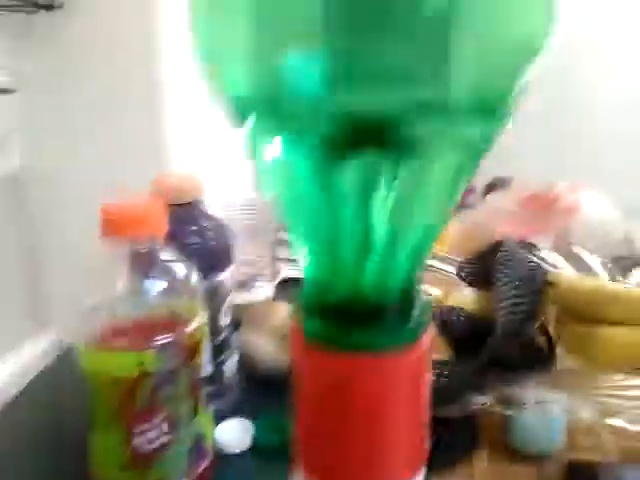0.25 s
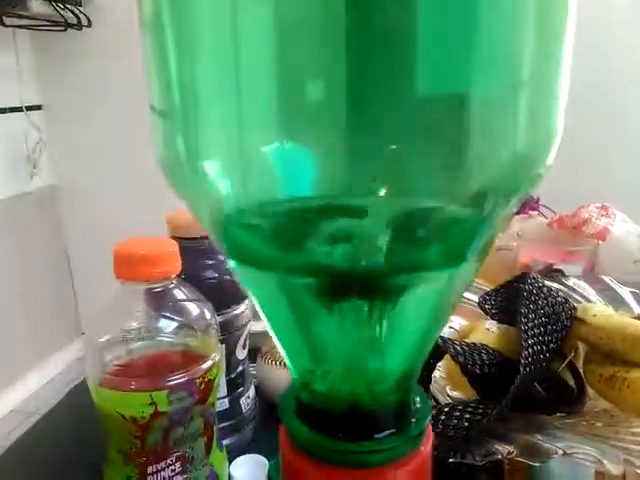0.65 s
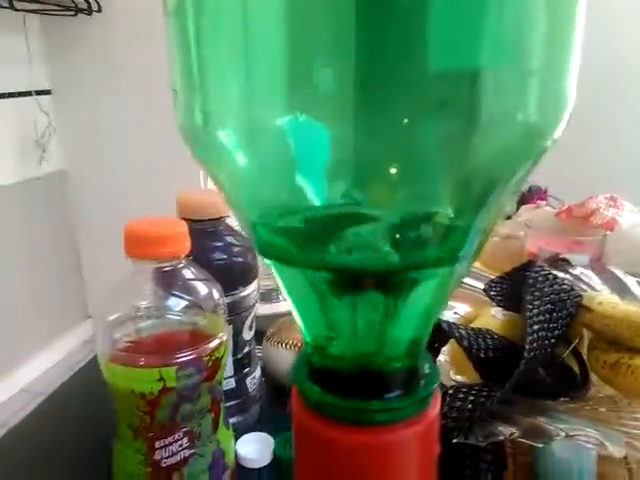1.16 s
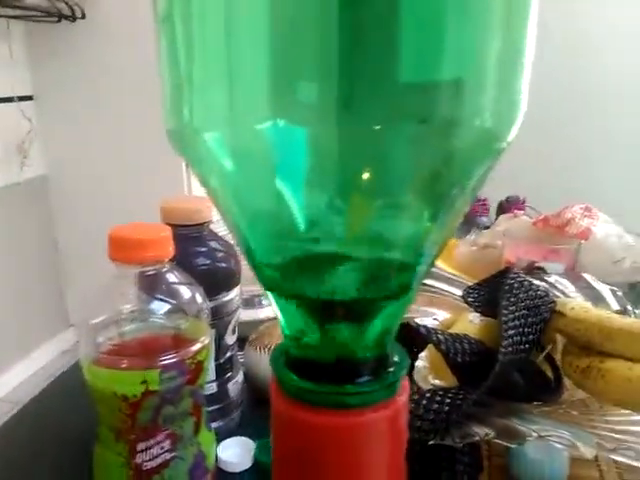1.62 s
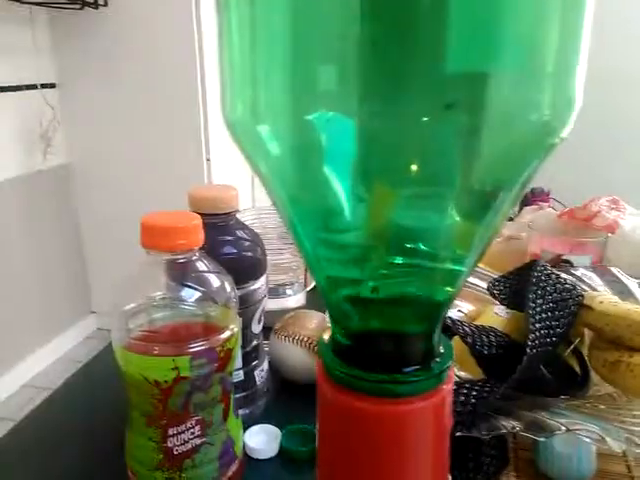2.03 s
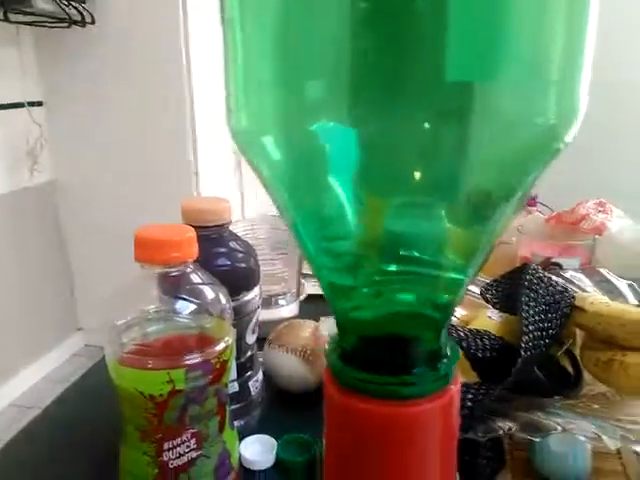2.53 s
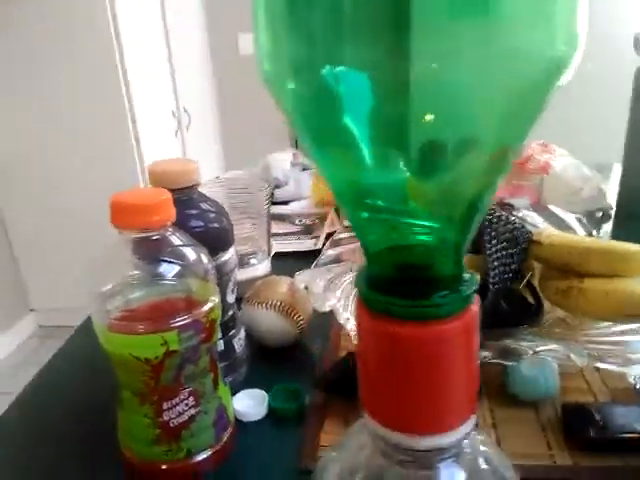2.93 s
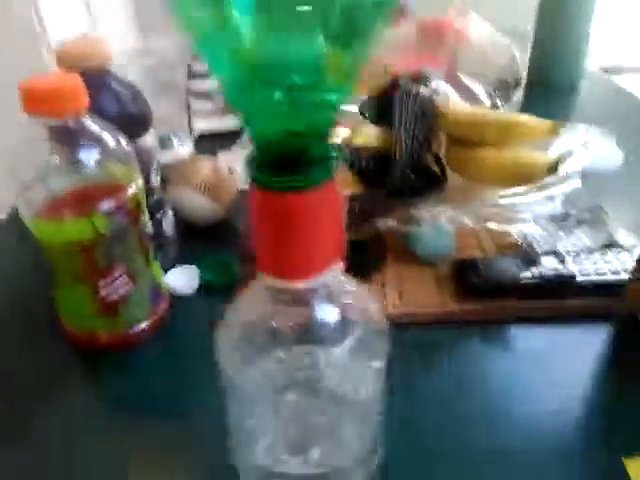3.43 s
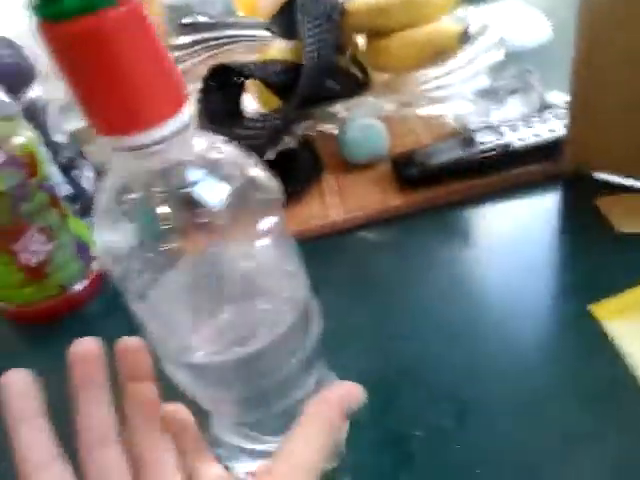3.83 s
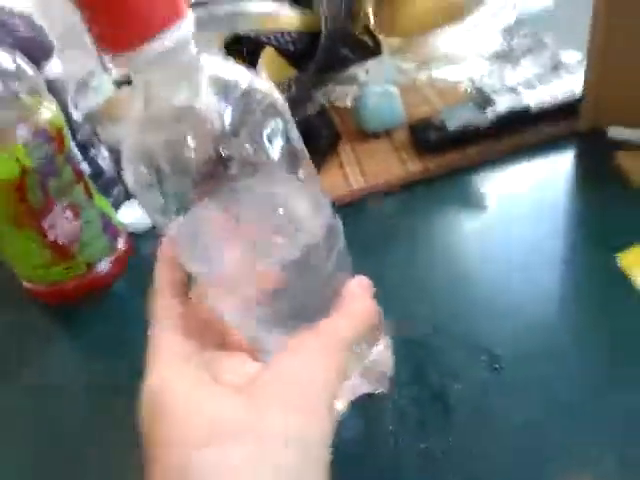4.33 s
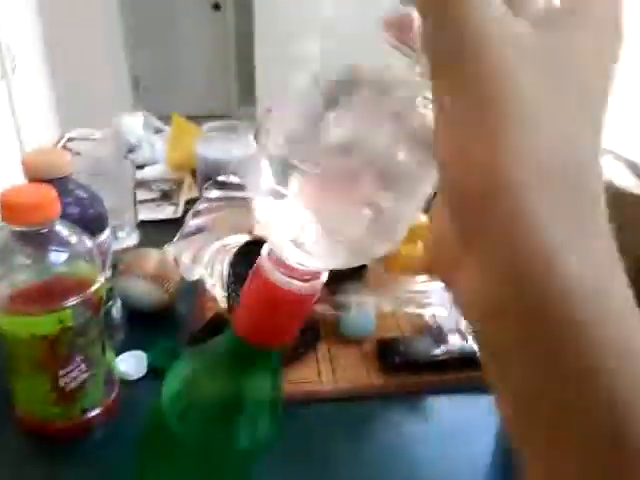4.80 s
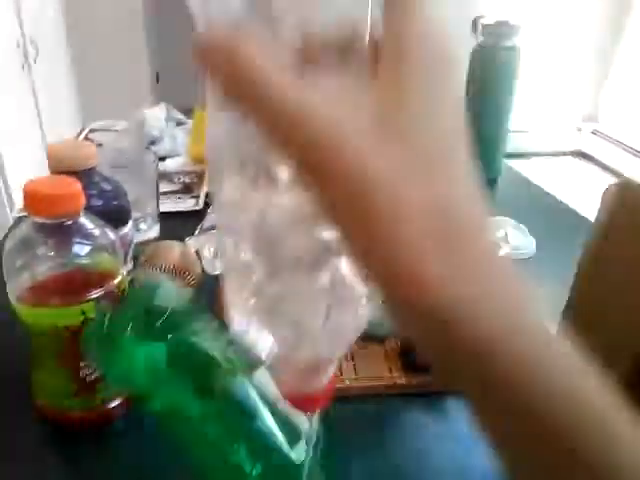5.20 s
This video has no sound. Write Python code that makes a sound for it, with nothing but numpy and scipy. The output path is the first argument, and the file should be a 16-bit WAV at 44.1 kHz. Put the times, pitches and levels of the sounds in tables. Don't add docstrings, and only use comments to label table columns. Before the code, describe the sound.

A close, hand-held stereo microphone in a lightly reverberant kitchen. From 0 to about 2.4 seconds water swirls between two plastic bottles: a frothy burst at the very start, then irregular mid-pitched glugs and pops, quick high pings, ticking drops and fine spitting fizz. The bubbling is busiest in the first second, with sharp pops near 1.0, 1.1 and 1.5, then thins out and runs dry around 2.5. Until 4.8 it is nearly quiet: low refrigerator hum, soft room noise, slight handling rumble around 3.15, tiny plastic creaks, and a faint rub from 3.5, clearest near 3.9 and fading. At 4.86 a bottle strikes the table with a loud, boomy plastic thump, followed by rapid weaker rattles until 5.18. A sharp crack comes at 5.22, then hollow, pitched knocks at 5.30, 5.36 and 5.44, with water slopping until the abrupt end near 5.46.

```python
import sys
import numpy as np
from scipy import signal
from scipy.io import wavfile

SR = 44100
rng = np.random.default_rng(int(sys.argv[2]) if len(sys.argv) > 2 else 0)


def to_wav(s):
    ch = np.atleast_2d(s).T
    pcm = np.round(np.clip(ch, -1, 1) * 32767)
    wavfile.write(sys.argv[1], SR, pcm.astype(np.int16))


def magnitude_from_level(level_db):
    exponent = np.asarray(level_db, float) / 20
    return 10 ** exponent


N = 240948

FOAM_DB_PER_S = 407


def bubbles(rows, tone_db, rise, splash_db, swell_s, hold, foam_db=-24):
    length = 4000
    out, t = np.zeros((2, N + length)), np.arange(length) / SR
    chances = rng.standard_normal((len(rows), length))
    for (start_s, level_db, pitch_hz, t60), chance in zip(rows, chances):
        envelope = -np.expm1(-t / swell_s) * magnitude_from_level(-60 * (t / t60) ** hold)
        creep = 1 + rise * (1 + 0.85 * chance[1]) * t / t60
        tone = np.sin(2 * np.pi * pitch_hz * t * creep)
        splash_t60 = 6.5 / pitch_hz
        splash = rms_one(ring(ring(chance, pitch_hz, splash_t60), pitch_hz, splash_t60))
        fade = magnitude_from_level(foam_db - FOAM_DB_PER_S * t) * np.cos(np.pi / 2 * t / t[-1])
        foam = fade * rms_one(ring(chance[::-1], pitch_hz, 15.0 / pitch_hz))
        sound = envelope * (magnitude_from_level(tone_db) * tone + magnitude_from_level(splash_db) * splash) + foam
        pan = sides(at_hz(PORTS, pitch_hz) + 2.0 * chance[0])
        i = round(start_s * SR)
        out[:, i:i + length] += magnitude_from_level(level_db) * pan * sound
    return out[:, :N]


def with_ring(rows, t60):
    return [tuple(row) + (t60,) for row in rows]


# start_s [s], level_db [dB, peak], pitch_hz [Hz],
# ring_t60 [s]
GLUGS = [(0.005, -57.5, 499, 0.22), (0.16, -53, 500, 0.13), (0.31, -47, 192, 0.064),
         (1.03, -56.5, 300, 0.2), (2.72, -59, 300, 0.084), (0.046, -38, 1133, 0.046),
         (0.1085, -32, 950, 0.031), (0.162, -43, 1497, 0.051), (0.182, -30.5, 1000, 0.016),
         (0.318, -45, 1420, 0.072), (0.381, -43, 1446, 0.076), (0.429, -31.5, 1115, 0.014),
         (0.485, -34.5, 1750, 0.025), (0.575, -32, 1444, 0.052), (0.682, -27, 1800, 0.017),
         (0.767, -31.5, 1010, 0.022), (0.816, -33.5, 1400, 0.031), (0.848, -29.5, 1450, 0.033),
         (0.9, -33, 1460, 0.016), (1.024, -17.5, 1534, 0.0095), (1.025, -42.5, 840, 0.081),
         (1.026, -40, 1032, 0.064), (1.895, -41, 815, 0.061), (2.075, -38, 850, 0.046),
         (0.2, -57, 289, 0.25), (0.4, -62.5, 294, 0.2), (1.137, -21.5, 1650, 0.0062),
         (1.18, -46.5, 842, 0.1), (1.208, -41, 1430, 0.064), (1.4, -39, 1280, 0.033),
         (1.484, -22, 2110, 0.0067), (1.507, -27, 1050, 0.0097), (1.555, -35, 1436, 0.076),
         (1.635, -49, 790, 0.05), (1.893, -34, 1010, 0.037), (1.996, -45.5, 838, 0.077),
         (2.02, -29, 1468, 0.039), (2.073, -33, 1154, 0.051), (2.221, -41, 856, 0.026),
         (2.271, -33, 851, 0.037)]
# start_s [s], level_db [dB, peak], pitch_hz [Hz], ring_t60 [s]
PINGS = [(0.0719, -46, 3100, 0.0085), (0.087, -29, 3500, 0.0078), (0.1303, -41, 2370, 0.023),
         (0.1638, -48, 2610, 0.013), (0.363, -44.5, 2340, 0.0041), (0.4818, -55, 2860, 0.014),
         (0.611, -44, 3500, 0.015), (0.6199, -34.5, 2560, 0.0069), (0.667, -45, 2570, 0.011),
         (0.735, -53, 2440, 0.011), (0.8682, -47.5, 2210, 0.013), (0.8982, -48, 2430, 0.017),
         (0.9527, -37, 3780, 0.0064), (1.041, -51, 2940, 0.029), (1.1202, -42.5, 2490, 0.012),
         (1.2055, -29.5, 1900, 0.0017), (1.279, -35.5, 3860, 0.0062), (1.488, -52, 3040, 0.028),
         (1.5343, -42.5, 3140, 0.014), (1.554, -28, 3580, 0.003), (1.8316, -41.5, 3700, 0.021),
         (2.1257, -54.5, 2890, 0.018), (2.167, -43.5, 3080, 0.011), (2.2206, -53, 2880, 0.031)]


def gulped_bubbles():
    large = bubbles(GLUGS, 3.1, 0.053, -12.0, 0.0022, hold=0.97, foam_db=-31.0)
    return large + bubbles(PINGS, 10.1, 0.1, -2.3, 0.0013, hold=1.63, foam_db=-23.0)


# start_s [s], level_db [dB, peak], pitch_hz [Hz]
DROPS = [(0.04, -43, 6230), (0.191, -31, 4500), (0.217, -47, 5350), (0.233, -43.5, 5510),
         (0.2994, -49.5, 5670), (0.3853, -40.5, 4790), (0.6473, -38.5, 5060), (0.7356, -43, 5000),
         (0.901, -54, 5600), (0.991, -38, 4890), (1.125, -46, 4720), (1.272, -38.5, 4580),
         (1.324, -47.5, 5620), (1.415, -50, 5820), (1.4353, -40, 5880), (1.58, -44.5, 5710),
         (1.6384, -53, 5530), (1.736, -38, 4670), (1.7958, -45, 5580), (2.0025, -46.5, 6130),
         (2.0362, -37, 4500), (2.126, -50.5, 6050), (2.2789, -48.5, 5490), (2.34, -51.5, 5850),
         (2.438, -46.5, 4810), (2.6803, -49, 4910)]
# start_s [s], level_db [dB, peak], pitch_hz [Hz]
SPITS = [(0.087, -39.5, 9050), (0.233, -40, 9500), (0.257, -38.5, 10700), (0.338, -44, 8360),
         (0.5157, -40, 8660), (0.593, -35, 8550), (0.611, -36, 7700), (0.753, -37, 7060),
         (0.8413, -27.5, 8350), (0.899, -34, 6800), (0.991, -36, 6950), (1.024, -32, 8720),
         (1.269, -37.5, 12500), (1.431, -41, 6750), (1.4597, -41.5, 8300), (1.635, -42, 7900),
         (1.687, -48, 7700), (1.87, -44.5, 7300), (1.9668, -32.5, 7570), (2.073, -45, 8370),
         (2.123, -38, 9100), (2.167, -44, 10200), (2.22, -45, 8500), (2.277, -38.5, 7740),
         (2.337, -48, 9400), (2.352, -39.5, 8300), (2.407, -40.5, 7400)]


def drops_and_spits():
    drops = bubbles(with_ring(DROPS, .014), 3.2, 0.0023, -11.0, 0.00018, hold=1.8, foam_db=-30)
    drops = signal.sosfilt(signal.butter(3, 3900, "high", fs=SR, output="sos"), drops)
    return drops + bubbles(with_ring(SPITS, .011), -7, .02, -1.5, .0008, hold=1.1)


# start_s [s], level_db [dB, peak], pitch_hz [Hz]
FAINT_GLUGS = [(0.001, -42.5, 1296), (0.011, -42, 1835), (0.117, -34, 1017), (0.288, -54.5, 1450),
               (0.452, -48.5, 1450), (0.693, -49, 1880), (0.782, -49.5, 950), (0.864, -42.5, 1500),
               (0.911, -56, 1450), (1.042, -38, 1425), (1.059, -39.5, 1390), (1.147, -44, 1490),
               (1.17, -53, 890), (1.365, -51, 1270), (1.414, -51.5, 1480), (1.94, -53, 890),
               (2.039, -47, 930), (2.433, -63, 880)]
# start_s [s], level_db [dB, peak], pitch_hz [Hz]
FAINT_PINGS = [(0.0298, -34, 3670), (0.1173, -57, 2420), (0.2174, -44, 3150), (0.3192, -48, 2270),
               (0.3747, -40.5, 2260), (0.5524, -61, 2880), (0.5621, -57, 2260), (0.6186, -31, 3030),
               (0.6893, -35, 2270), (0.805, -33.5, 4160), (0.8329, -44.5, 2600), (0.9834, -46, 2900),
               (1.1354, -46, 2080), (1.1712, -38, 1980), (1.3222, -44.5, 2820), (1.3703, -49.5, 2660),
               (1.6332, -54, 2360), (1.6648, -41, 2940), (1.738, -42.5, 3700), (1.8322, -39.5, 4130),
               (1.839, -48, 2520), (1.942, -45.5, 1900), (2.0048, -44.5, 2890), (2.3286, -56, 2120)]
# start_s [s], level_db [dB, peak], pitch_hz [Hz]
FAINT_DROPS = [(0.0653, -51, 5900), (0.0882, -44, 4500), (0.1401, -46, 6200), (0.2074, -47, 5370),
               (0.2274, -38, 5700), (0.3222, -42, 5420), (0.3731, -35, 4500), (0.4248, -52, 5360),
               (0.4608, -44, 5340), (0.5142, -52, 6800), (0.5544, -56, 5670), (0.785, -42, 5280),
               (0.8094, -46, 5310), (0.8365, -52, 5400), (0.8788, -46, 5630), (0.9124, -40.5, 5560),
               (0.9388, -49, 5630), (0.9522, -40, 5240), (1.0231, -38, 6540), (1.1717, -44.5, 5600),
               (1.3058, -47, 5330), (1.3427, -37.5, 5700), (1.4002, -40, 6050), (1.5289, -35, 4500),
               (1.7599, -41, 6130), (1.8696, -51.5, 5600), (1.8921, -48.5, 5660), (1.93, -43, 5340),
               (2.0717, -52, 5620), (2.1669, -49, 5450), (2.2198, -47, 5770), (2.3531, -50, 5950),
               (2.4777, -50, 5660)]
# start_s [s], level_db [dB, peak], pitch_hz [Hz]
FAINT_SPITS = [(0.037, -39, 8800), (0.1394, -39.5, 8380), (0.2994, -45, 9260), (0.3844, -58, 8100),
               (0.6459, -44, 7900), (0.7344, -49, 7500), (0.9517, -45, 7950), (1.1722, -50, 7440),
               (1.3059, -47.5, 8600), (1.3423, -56, 7150), (1.3987, -53, 8200), (1.4844, -46, 7600),
               (1.5783, -50, 8340), (1.7594, -62, 7010), (1.9081, -46, 8600), (1.9295, -52, 8240),
               (2.0023, -40, 7500), (2.0368, -54, 7210), (2.2444, -59, 7360), (2.3755, -53, 7390),
               (2.4364, -45, 7500), (2.4748, -61, 7900)]


def faint_bubbles():
    families = [(FAINT_GLUGS, 3.0, .022), (FAINT_PINGS, 1.5, .012),   # rows, dB, ring t60 s
                (FAINT_DROPS, -4.0, .012), (FAINT_SPITS, 1.5, .006)]
    out = 0
    for rows, level_db, t60 in families:
        faint = bubbles(with_ring(rows, t60), -2.2, 0.027, -10.5, 0.0012, hold=1.88, foam_db=-21.5)
        out = out + magnitude_from_level(level_db) * faint
    return out


# pitch_hz [Hz], level_db [dB], ring_t60 [s]
CAVITY = [(303, -13, 0.46), (825, -15.5, 0.14), (1010, -15, 0.16), (1426, -9, 0.11), (1880, -20, 0.12),
          (2940, -5, 0.03), (5000, -21, 0.0034), (5600, -6, 0.025)]


def cavity(rows, wake_db):
    at = [round(row[0] * SR) for row in rows]
    levels_db = np.array([row[1] for row in rows])
    pitches = np.array([row[2] for row in rows])
    out = 0
    for hz, mode_db, t60 in CAVITY:
        octaves_apart = np.abs(np.log2(pitches / hz))
        chance_db = 0.71 * rng.standard_normal(len(at))
        clicks = np.zeros(N)
        clicks[at] = magnitude_from_level(levels_db + mode_db + wake_db - 15.2 * octaves_apart + chance_db)
        soft = ring(ring(clicks, hz, t60), hz, 6 / hz) * hz / 8000
        broken = magnitude_from_level(7.5 * drift(36) - 3.5)
        out = out + sides(at_hz(PORTS, hz)) * soft * broken
    return out


def trickle(spectrum, per_s, cycles, size_db, patchy_db, count):
    sizes = magnitude_from_level(size_db * np.minimum(rng.exponential(1, N), 4)) * rng.choice([-1, 1], N)
    born = rng.random(N) < per_s * magnitude_from_level(5.5 * drift(15)) / SR
    dealt = rng.integers(0, count, N)
    out = 0
    for k, hz in enumerate(np.geomspace(spectrum[0][0], spectrum[-1][0], count)):
        clicks = sizes * born * (dealt == k) * magnitude_from_level(patchy_db * drift(22.0))
        rung = ring(ring(clicks, hz, cycles / hz), hz, cycles / hz / 2) * hz
        out = out + magnitude_from_level(at_hz(spectrum, hz)) * sides(at_hz(PORTS, hz)) * rung
    return rms_one(out)


# start_s [s], level_db [dB over the calm stream]
GULPS = [
    (0, 34),
    (0.308, 16),
    (.61, 15),
    (.82, 14.5),
    (1.025, 8),
    (1.268, 15.5),
    (1.485, 22),
    (1.987, 13.5),
    (2.429, 2),
]
FROTH_DB_PER_S, DRY_S, DRY_DB_PER_S = 88, 2.464, 300


def flow_db(calm_db, follows):
    t = np.arange(N) / SR
    froth = 1 + sum(magnitude_from_level(db - FROTH_DB_PER_S * (t - s)) * (t >= s) for s, db in GULPS)
    return calm_db + follows * 20 * np.log10(froth) - DRY_DB_PER_S * np.maximum(t - DRY_S, 0)


# pitch_hz [Hz], level_db [dB]
STREAM_BODY = [(500, -63), (850, 2), (1100, 5), (1450, -13), (2000, 6), (2900, -6), (3600, 15)]
# pitch_hz [Hz], level_db [dB]
STREAM_FIZZ = [(4400, -4), (5500, -19.5), (6300, -11), (8000, -12), (11000, -16.5), (14200, -10.5)]


def stream():
    body_db, fizz_db = flow_db(-74.5, follows=1.0), flow_db(-68.5, follows=0.67)
    body = trickle(STREAM_BODY, 400, 30.5, 9.0, patchy_db=8.5, count=16)
    fizz = trickle(STREAM_FIZZ, 2200, 43, 1.16, patchy_db=5.5, count=18)
    return magnitude_from_level(body_db) * body + magnitude_from_level(fizz_db) * fizz


# pitch_hz [Hz], level_db [dB], ring_t60 [s]
THUMP = [(87, -38, .1), (135, -5.5, 0.089), (227, -5, 0.14), (266, -1, 0.11), (295.6, 0, 0.24),
         (400, -11, 0.075), (416, -16, 0.042), (487, -9.5, 0.14), (596, -9, 0.064)]
# pitch_hz [Hz], level_db [dB], ring_t60 [s]
HOLLOW = [(808, -18, 0.04), (938, -11, 0.07), (955, -40, 0.05), (1002, -11, 0.06), (1068, 1.5, 0.022),
          (1150, -40, 0.022)]
# pitch_hz [Hz], level_db [dB], ring_t60 [s]
KNOCK = [(970, -9, 0.066), (1163, -10, 0.034), (1290, -9.5, 0.0076), (1690, -1, 0.02), (1928, -2, 0.013),
         (2195, -3.5, 0.015), (2590, -4.5, 0.0085), (3100, -34, 0.0022)]
# pitch_hz [Hz], level_db [dB], ring_t60 [s]
CRACK = [(3760, -0.5, 0.0046), (4500, -14, 0.0066), (4990, 0.5, 0.0037), (5880, -4.5, 0.0067),
         (6800, 4.5, 0.0014), (7700, -7, 0.0023), (9700, -8, 0.0013), (12100, -13, 0.0008)]
# thump_db, hollow_db, knock_db, crack_db
BLOWS = [(4.8552, -6, -11.5, -4, -17), (4.8592, -25, -17, -16, -35), (5.2152, -26, -25, -27, -39),
         (5.2171, -14.5, -11, -16, -3.5), (5.224, -51, -17, -21.5, -16), (5.2991, -48, -1, -16.5, -17.5),
         (5.307, -48, -36, -41, -29), (5.346, -50, -18, -27, -21.5), (5.361, -37, -1, -13, -23.5),
         (5.368, -50, -18, -27, -42), (5.382, -28, -16, -44, -45), (5.4077, -40, -37, -52, -26),
         (5.428, -47, -37, -41, -22), (5.445, -44, -7, -15.5, -20.5)]
# start_s [s], level_db [dB, peak], extra_brightness_db [dB]
RATTLE = [(4.9182, -18, 6.5), (4.958, -15.5, -8), (4.9879, -23.5, 8.5), (5.009, -20.5, -3),
          (5.0297, -23, -9), (5.0544, -24.5, -3), (5.0747, -22.5, -8), (5.0985, -33, 9), (5.117, -26, 0),
          (5.139, -36, -3), (5.1505, -24.5, 6.5), (5.1754, -25.5, 4.5), (5.3869, -29, -8), (5.4072, -36, 4)]


def clatter():
    s, thump, hollow, knock, crack = np.transpose(BLOWS)
    blows = struck(s, thump - 12, THUMP, 0.0022, 0.44, rough=0.14)
    blows += struck(s, hollow - 6, HOLLOW, 0.000087, 1.0, rough=0.19)
    blows += struck(s, knock + 3, KNOCK, .004, 1.5, rough=.9)
    blows += struck(s, crack + 3.0, CRACK, 0.0029, 0.67, rough=1.0)
    s, bounce_db, bright_db = np.transpose(RATTLE)
    rattle = struck(s, bounce_db - 21.5, THUMP + HOLLOW[2:5], 0.00093, 4.8, rough=0.061)
    rattle += struck(s, bounce_db - 1.5, KNOCK, 0.0017, 4.8, rough=0.82)
    rattle += struck(s, bounce_db - 13.5 + bright_db, CRACK[:6], 0.0055, 1.9, rough=1.0)
    return signal.sosfilt(signal.butter(2, 95, "high", fs=SR, output="sos"), blows + rattle)


def struck(times, levels_db, modes, contact_s, spread_db, rough):
    length, start = 800, round(4.8 * SR)
    out, t = np.zeros((2, N)), np.arange(length) / SR
    contact = contact_s * SR
    for hz, mode_db, t60 in modes:
        force = np.zeros((2, N - start + length))
        chances = rng.standard_normal((len(times), 2, length))
        for s, level_db, chance in zip(times, levels_db, chances):
            click = (1 - rough) * contact * (t == 0)
            chatter = rough * np.sqrt(contact) * chance
            push = np.exp(-t / contact_s) * (click + chatter) / contact
            i = round(s * SR) - start
            force[:, i:i + length] += magnitude_from_level(level_db + mode_db + spread_db * chance[0, -1]) * push
        out[:, start:] += sides(at_hz(PORTS, hz)) * ring(force[:, :-length], hz, t60)
    return out


# start_s [s], level_db [dB, peak], pitch_hz [Hz], length_s [s]
SWELLS = [
    (5.303, -7.5, 1059, 0.018),
    (5.366, -16, 1038, .017),
    (5.379, -14.5, 1060, 0.016),
    (5.398, -23.5, 958, 0.026),
    (5.420, -27, 1103, .014),
]


def air_column():
    return bubbles(SWELLS, 0.0, 0.0016, -21, 0.0035, hold=4.7, foam_db=-17.5)


# start_s [s], level_db [dB]
SLOP = [
    (4.86, -19.5),
    (4.9, -33.5),
    (5.1, -35.5),
    (5.2, -40),
    (5.23, -32.5),
    (5.29, -38),
    (5.32, -30),
    (5.46, -29.5),
]
# pitch_hz [Hz], level_db [dB per Hz]
SLOP_LOW = [(110, -10.5), (260, 1), (490, 4.5), (750, -7), (1040, 0.5), (1500, -2), (2300, -17),
            (3200, -20)]
# pitch_hz [Hz], level_db [dB per Hz]
SLOP_HIGH = [(2800, -10.5), (3800, 10), (5500, -7.5), (7000, -17), (10000, -17), (14300, -30)]


def slop():
    low_db = in_time(SLOP)
    high_db = -40.5 + 0.93 * (low_db - np.mean(SLOP, axis=0)[1])
    low = coloured(SLOP_LOW, 1.34, 22, grain_db=1.7, alike_share=5.1, panned=0.24)
    high = coloured(SLOP_HIGH, 2.4, 26, grain_db=1.6, alike_share=.9, panned=0.69)
    return magnitude_from_level(low_db) * low + magnitude_from_level(high_db) * high


# start_s [s], level_db [dB, peak], pitch_hz
# [Hz], ring_t60 [s]
CREAKS = [(2.375, -62.5, 2280, 0.069), (2.813, -46, 1020, 0.012), (2.6805, -58.5, 6000, 0.048),
          (4.638, -77, 5000, 0.08), (2.845, -57, 3460, 0.013), (2.893, -57, 3720, 0.021),
          (2.929, -46, 4180, 0.0095), (2.931, -62, 13600, 0.11), (3.483, -74.5, 5740, 0.38),
          (4.227, -45, 5140, 0.014), (4.262, -54, 2980, 0.017), (4.55, -59.5, 600, 0.11),
          (4.286, -55, 1850, 0.029), (4.454, -72, 5600, 0.23), (4.488, -51, 955, 0.023),
          (4.636, -38.5, 5000, 0.0068), (4.773, -45.5, 6850, 0.02), (4.775, -49.5, 1430, 0.036),
          (4.782, -45, 4530, 0.29), (4.841, -33.5, 2060, 0.022)]


def creaks():
    return bubbles(CREAKS, -11, .01, -1.5, .0015, hold=1.1)


def rub():
    touch_s, slip_s, end_s = 3.46, 3.905, 4.85
    modes = [(1006, -20, 0.064), (1060, 1, 0.043), (1850, -11, 0.017),   # Hz, dB, t60 s
             (1450, -2.0, 0.015), (1570, 5, 0.0033), (600, -4.5, 0.044)]
    white = rng.standard_normal((2, N))
    wall = sum(magnitude_from_level(db) * ring(white, hz, t60) for hz, db, t60 in modes)
    t = np.arange(N) / SR
    slide = magnitude_from_level(-69.5 - 39 * (t - slip_s)) + magnitude_from_level(-75)
    level = np.where(t < slip_s, magnitude_from_level(-80.5), slide)
    return level * ((t > touch_s) & (t < end_s)) * rms_one(wall)


def table_top():
    shaken = ring(rng.standard_normal(N), 67.5, 0.26)
    return magnitude_from_level(-65.5) * np.clip((2.4 - np.arange(N) / SR) / 0.18, 0, 1) * rms_one(shaken)


# pitch_hz [Hz], level_db [dB], width_hz [Hz]
HUM = [(119.7, -61.5, 0.35), (240.5, -76, 4.4), (363, -78, 5.5), (611, -88, 3.7)]


def refrigerator():
    t, out = np.arange(N) / SR, 0
    for hz, db, width in HUM:
        level = magnitude_from_level(db + 1.5 * np.sqrt(width) * drift(6.7))
        out = out + level * np.sin(2 * np.pi * hz * t + 1.96 * drift(width / 2))
    return np.sqrt(2) * out


# start_s [s], level_db [dB]
GRIP = [
    (0, -55),
    (3.0, -53.5),
    (3.15, -45.5),
    (3.4, -54),
    (4.7, -52.5),
    (4.86, -49.5),
    (5.46, -53),
]


def grip():
    band = signal.butter(2, [7, 21], "band", fs=SR, output="sos")
    shared, left, right = signal.sosfilt(band, rng.standard_normal((3, N)))
    rumble = rms_one(shared + .45 * np.array([left, right]))
    return magnitude_from_level(in_time(GRIP) + .5 + 3 * drift(6)) * sides(-4) * rumble


# pitch_hz [Hz], decay_t60 [s]
ROOM_T60 = [(150, 0.69), (1000, 0.52), (4000, 0.41), (12000, 0.66)]


def room(pair):
    t, tail = np.arange(SR // 2) / SR, 0
    for low in 80 * 2.0 ** np.arange(8):
        band = signal.butter(2, [low, min(2 * low, .45 * SR)], "band", fs=SR, output="sos")
        decay = magnitude_from_level(-60 * t / at_hz(ROOM_T60, low))
        mid, side = signal.sosfilt(band, rng.standard_normal((2, len(t)))) * decay
        tail = tail + two_ports(mid, side, 5.5 * at_hz(LIKENESS, low))
    tail = tail * np.clip((t - .004) / 0.0002, 0, 1)
    tail /= np.sqrt(np.sum(tail ** 2, axis=1, keepdims=True))
    return signal.fftconvolve(pair, tail, axes=1)[:, :N]


# pitch_hz [Hz], level_db [dB per Hz]
AIR = [(45, -2.5), (75, 5), (140, -19), (300, -23.5), (550, -29.5), (2600, -29.5), (5500, -32),
       (14300, -37.5)]
# start_s [s], level_db [dB]
AIR_STIR = [
    (0, -70),
    (.3, -67.5),
    (.5, -72),
    (2.4, -72.5),
    (2.75, -71),
    (3.4, -66),
    (4.0, -68),
    (4.84, -67),
]


def kitchen_air():
    air = coloured(AIR, .8, 5.0, grain_db=.3, alike_share=.95, panned=.1)
    stir = signal.sosfilt(signal.butter(2, [150, 800], "band", fs=SR, output="sos"), air)
    return magnitude_from_level(-65) * air + magnitude_from_level(in_time(AIR_STIR) + 0.9 * drift(7.1)) * rms_one(stir)


def coloured(spectrum, patchy_db, rate_hz, grain_db, alike_share, panned):
    first, last = spectrum[0][0], spectrum[-1][0]
    edges = first * 2 ** np.arange(0, np.log2(last / first), .4)
    white = rng.standard_normal((2, 2, N)) * magnitude_from_level(grain_db * drift(69))
    out, together = 0, drift(rate_hz)
    for k, (low, high) in enumerate(zip(edges, np.append(edges[1:], last))):
        band = signal.butter(2, [low, high], "band", fs=SR, output="sos")
        mid, side = signal.sosfilt(band, white[k % 2])
        hz = np.sqrt(low * high)
        flicker_db = patchy_db * (together + drift(rate_hz))
        gain = magnitude_from_level(at_hz(spectrum, hz) + flicker_db) * sides(panned * at_hz(PORTS, hz))
        out = out + gain * two_ports(mid, side, alike_share * at_hz(LIKENESS, hz))
    return rms_one(out)


# pitch_hz [Hz], likeness [0 to 1]
LIKENESS = [(60, 0.067), (130, 0.27), (300, 0.36), (700, 0.063), (1500, 0.018), (4000, 0.0067)]


def two_ports(mid, side, alike):
    alike = np.clip(alike, 0, .99)
    return np.sqrt(1 + alike) * mid + np.sqrt(1 - alike) * side * [[1], [-1]]


def at_ports(pair):
    lag = 5
    shade = signal.butter(1, 10600, fs=SR)
    return np.array([signal.lfilter(*shade, np.roll(pair[0], lag)), pair[1]])


# pitch_hz [Hz], pan_db [dB]
PORTS = [(100, 1), (300, 1), (900, -4), (3000, -8.5), (4200, -4.5), (5500, 25.5), (6800, -4.5),
         (14000, -15)]


def sides(pan_db):
    return magnitude_from_level(np.array([[pan_db / 2], [-pan_db / 2]]))


def ring(clicks, hz, t60):
    r, w = magnitude_from_level(-60 / (t60 * SR)), 2 * np.pi * hz / SR
    return signal.lfilter([0, np.sin(w)], [1, -2 * r * np.cos(w), r * r], clicks + 1e-18)


def drift(rate_hz):
    r = np.exp(-80 * np.pi * rate_hz / SR)
    slow = signal.lfilter([1], [1, -2 * r, r * r], rng.standard_normal(N // 40 + 2002))[2000:]
    return np.interp(np.arange(N) / 40, np.arange(len(slow)), rms_one(slow - slow.mean()))


def rms_one(x):
    return x / np.sqrt(np.mean(x ** 2) + 1e-20)


def at_hz(points, hz):
    table_hz, values = np.array(points).T
    return np.interp(np.log(hz), np.log(table_hz), values)


def in_time(rows):
    s, level_db = np.transpose(rows)
    return np.interp(np.arange(N) / SR, s, level_db, left=-140, right=-140)


def scene():
    water = gulped_bubbles() + drops_and_spits() + creaks() + faint_bubbles()
    water += cavity(GLUGS + PINGS + DROPS + SPITS, wake_db=-16.5)
    water += stream()
    slopping = slop()
    blows = clatter()
    dull_blows = signal.lfilter(*signal.butter(1, 5000, fs=SR), blows)
    near = at_ports(water + blows) + magnitude_from_level(-12.5) * room(water) + magnitude_from_level(-7) * room(dull_blows)
    background = kitchen_air() + table_top()
    near += slopping + rub() + refrigerator() + grip() + background
    return near + at_ports(air_column())


def band_limit(x):
    return signal.sosfilt(signal.butter(12, 15600, fs=SR, output="sos"), x)


def record(dry):
    notch_hz, notch_width_hz, notch_depth = 4000, 800, .3
    dip = signal.lfilter(*signal.iirpeak(notch_hz, notch_hz / notch_width_hz, fs=SR), dry)
    rounded = 1.2 * np.tanh((dry - notch_depth * dip) / 1.2)
    cut = signal.sosfilt(signal.cheby1(10, .5, 13770, fs=SR, output="sos"), rounded)
    return band_limit(cut)


dry = scene()
out = record(dry)
to_wav(out)
```